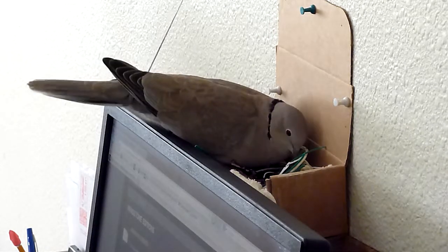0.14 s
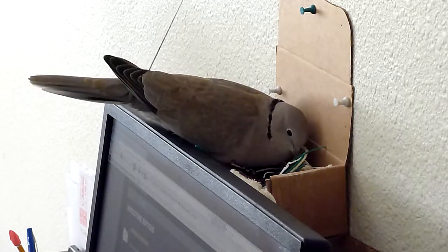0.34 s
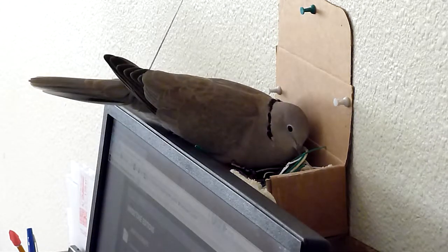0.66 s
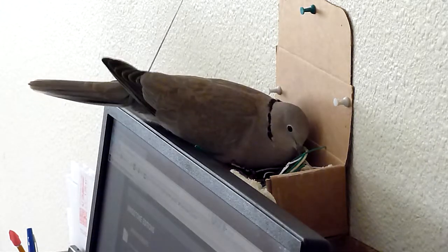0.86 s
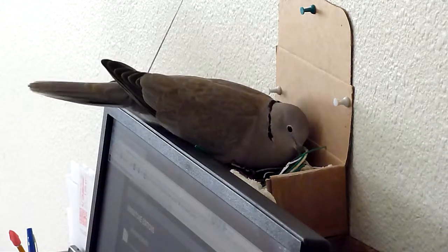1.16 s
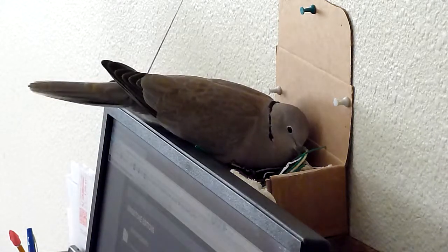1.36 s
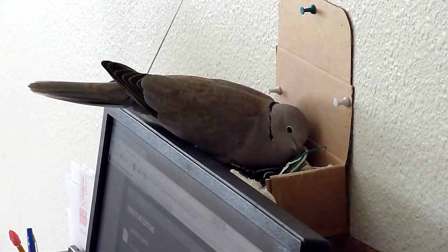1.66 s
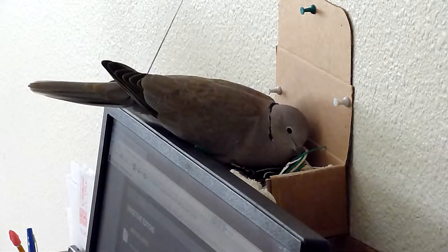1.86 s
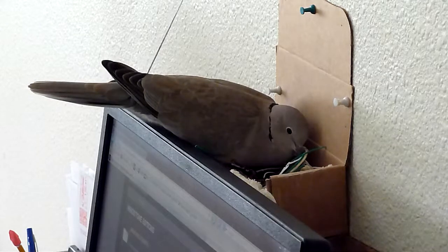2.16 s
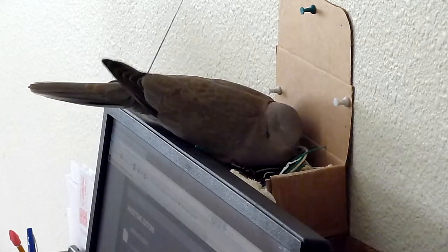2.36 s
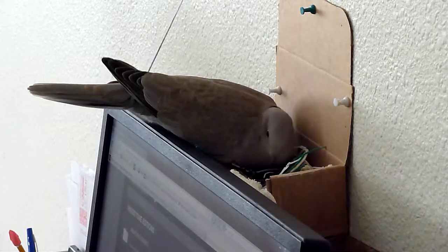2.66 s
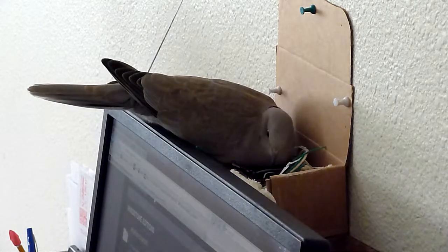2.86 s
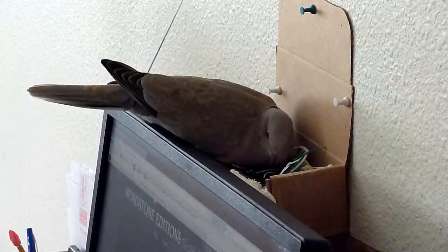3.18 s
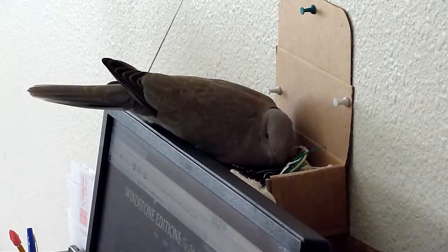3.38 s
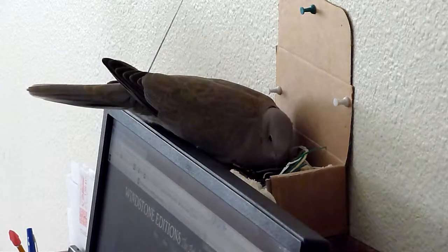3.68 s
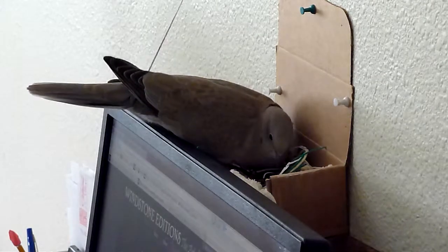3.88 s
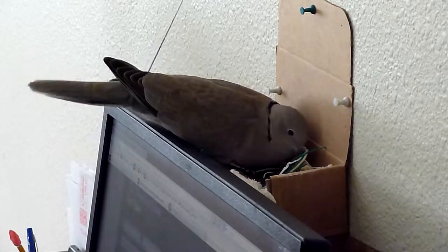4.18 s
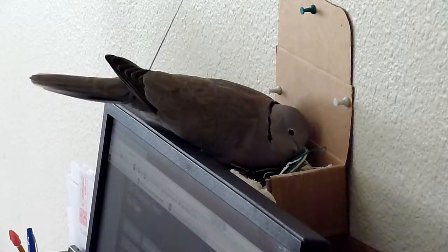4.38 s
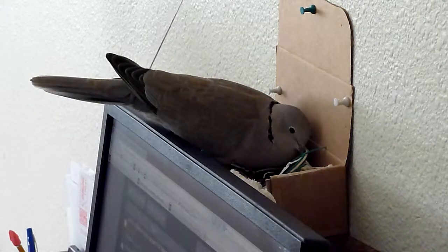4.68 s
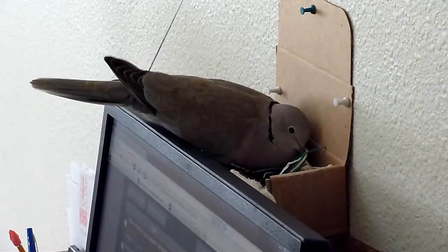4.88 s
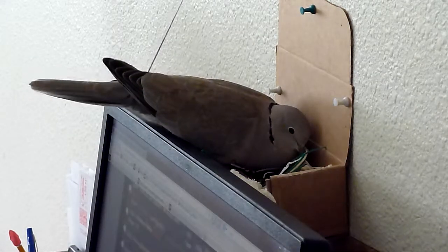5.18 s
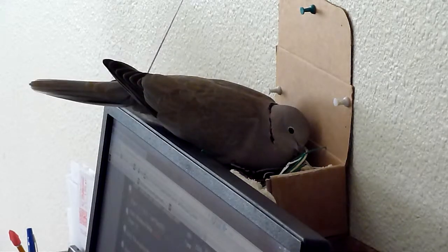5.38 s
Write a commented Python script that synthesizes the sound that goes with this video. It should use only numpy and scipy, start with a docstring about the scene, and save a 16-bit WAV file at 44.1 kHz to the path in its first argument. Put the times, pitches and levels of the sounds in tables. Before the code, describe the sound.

In a small room with a steady soft hiss and a very faint low hum, a dove close by and slightly left is already cooing. The tail of a short note ends at 0.1 s, a long hollow note runs from about 0.16 to 0.73 s, and a short one follows near 1.0 s. The tone is mid-low, smooth and nearly pure, fluttering in level, scooping up at its start and dropping at its end, with a little airy rasp and boxy room ringing. Quiet mouse clicks to the right come in pairs around 0.5-0.65 s, under the long note, and 1.45-1.6 s. Thin, bright switch ticks sound around 2.7 and 2.78 s. A soft, dull double knock on the desk comes at 3.45 s. The dove then repeats its phrase: short at 4.0 s, long from 4.2 to 4.75 s, short at 5.0 s, leaving only hiss until about 5.5 s.

```python
"""A dove's coo, already under way, is heard first over a soft hiss and low hum; six notes come in two groups.
Each note is a gliding near-pure tone with faint partials and airy rasp, coloured by a small room's low modes.
To the right, a mouse button clicks in pairs (ringing modes) and a thin switch ticks (short noise bursts).
A soft double knock, low noise plus ringing desk modes, comes shortly before the second group of notes.
Two microphone ports hear it all: the dove, nearer the left one, reaches that port louder and earlier."""
import sys
import numpy as np
from scipy import signal
from scipy.fft import rfft, irfft
from scipy.io import wavfile
from scipy.ndimage import uniform_filter1d

SR = 44100
rng = np.random.default_rng(int(sys.argv[2]) if len(sys.argv) > 2 else 0)


def log_audio(samples):
    """Write samples as a 16-bit WAV file to the path given in sys.argv[1]."""
    # one column per channel
    frames = np.atleast_2d(samples).T
    # limit to full scale, then quantise
    limited = np.clip(frames, -1, 1)
    pcm = np.round(limited * 32767).astype(np.int16)
    wavfile.write(sys.argv[1], SR, pcm)


N = 244314  # length in samples

# All levels in the tables are relative: later gains still act on them.
# Coos: start_s, end_s, base_pitch_hz, final_drop_share_of_pitch, drop_time_s, second_partial_db,
# half_pitch_partials_db, rasp_db, fourth_partial_db, sixth_partial_db
NOTES = [(-0.058, 0.099, 540.5, 0.047, 0.0075, -56, -40, -39.5, -67, -81),
         (0.16, 0.728, 544.3, .27, .04, -58.5, -75.5, -40.5, -72, -73.5),
         (0.965, 1.094, 554.5, 0.197, 0.014, -58, -74, -40.5, -71, -70),
         (3.98, 4.13, 546, 0.1, 0.0079, -53, -43.5, -41, -67, -74),
         (4.2, 4.765, 539.9, .28, .04, -57.5, -73, -40, -67, -77),
         (5.012, 5.126, 556, 0.18, .022, -56, -86, -42.5, -66.5, -80.5)]
# Swells and dips of the main tone, one curve a note: time_s, level_db
TONE_CURVES = [
    [(0.0, -11.5), (0.027, -21.5), (0.052, -27.5), (0.07, -16.5), (0.093, -16.5), (0.105, -22.5)],
    [(0.16, -37.5), (0.199, -21), (0.219, -15), (0.245, -35), (0.262, -29), (0.29, -18), (0.315, -28),
     (0.35, -18.5), (0.42, -26.5), (0.488, -19), (0.55, -30), (0.612, -12), (0.638, -26), (0.66, -19),
     (0.683, -15), (0.692, -19.5), (0.703, -32), (0.728, -25)],
    [(0.965, -32), (0.983, -28.5), (1.012, -14.5), (1.026, -32.5), (1.042, -21), (1.058, -16),
     (1.078, -21.5), (1.096, -21)],
    [(3.979, -26), (4.007, -42), (4.025, -23), (4.037, -25.5), (4.05, -14.5), (4.065, -32.5),
     (4.095, -26.5), (4.11, -16), (4.133, -16)],
    [(4.2, -38.5), (4.24, -22.5), (4.266, -16), (4.297, -23.5), (4.34, -14), (4.41, -24), (4.44, -19),
     (4.47, -27.5), (4.5, -18), (4.55, -19), (4.6, -14.5), (4.635, -13.5), (4.665, -25), (4.69, -17.5),
     (4.714, -15.5), (4.761, -34)],
    [(5.009, -31), (5.028, -32.5), (5.04, -20), (5.048, -18.5), (5.062, -14.5), (5.085, -16),
     (5.108, -16.5), (5.126, -21.5)],
]
# Upper partials: multiple_of_pitch, level_db over the second-partial setting
OVERTONES = [(2, -2.5), (3, -20.5)]
# Partials heard when every second throat pulse is weaker: multiple_of_pitch, level_db
HALF_PITCH_PARTIALS = [(.5, -7.5), (1.5, 1.5), (2.5, -20.5), (3.5, -25.5)]
# Air noise in the throat: frequency_hz, density_db (per Hz)
RASP_COLOUR = [(200, -38.5), (330, -25), (450, -2.5), (560, 9), (680, 3), (780, -15.5), (1000, -23.5),
               (2000, -44.5), (4000, -64)]
# Low modes of the room: frequency_hz, level_db, t60_s (time to fall 60 dB), sign (between bird and ports)
ROOM_MODES = [(352, 11.5, 0.19, 1), (330, 0, 1, -1), (378.9, 12, 0.4, 1), (394, 9.5, 0.44, 1),
              (397, -2, 0.66, 1), (413, -11, 0.43, -1), (437.4, 6, 0.37, 1), (453, -4, 0.78, -1),
              (490, -5, 0.31, 1), (512, -4.5, 0.39, -1), (475.5, -9.5, 0.43, -1), (523.2, -8.5, 0.64, -1),
              (538.2, -0.5, 0.42, 1), (541.27, 5.5, 0.19, -1), (616.4, -12, 0.46, -1), (590, -1, 0.23, 1),
              (640, 2, 0.43, -1), (622, -6, 0.76, 1), (692, -8.5, 0.76, -1), (705, -7.5, 0.18, 1),
              (670, -6, 0.79, -1), (750, -10.5, 0.23, 1)]
# How long the dense reflections last: frequency_hz, t60_s
ROOM_TAIL = [(200, 0.18), (700, .38), (1500, 0.34), (4000, 0.52), (6000, 0.26), (9000, 0.25),
             (15000, 0.073)]
# Room air and microphone hiss, sum of the ports: frequency_hz, density_db (per Hz)
HISS_MID = [(12, -51), (20, -12), (172, -5), (204, -0.5), (228, -3.5), (377, -3.5), (433, -6), (471, -6),
            (1030, -10.5), (1180, -12), (2130, -15), (11100, -22.5), (16000, -32.5)]
# The same hiss, difference of the ports: frequency_hz, density_db (per Hz)
HISS_SIDE = [(12, -56.5), (20, -31), (60, -10.5), (150, -4.5), (356, -0.5), (471, -2.5), (542, -1),
             (737, -2), (1120, -2.5), (3940, -10), (16000, -24)]
# Slow swells of the hiss: time_s, level_db
HISS_SWELL = [(0, -2), (2.4, -3), (3.2, -1), (3.8, -2), (5.54, -2.5)]
# A narrow wavering hum: frequency_hz, density_db (per Hz)
HUM_COLOUR = [(150, -37), (185, -9.5), (203, 4.5), (222, 1), (270, -50)]
# Mouse button: time_s, level_db, released (0 pressed, 1 released)
MOUSE_CLICKS = [(0.528, -38, 0), (0.656, -33.5, 1), (1.463, -39, 0), (1.606, -33, 1)]
# Contact chatter within each click: delay_s, level_db
BOUNCES = [(0, -6), (.002, 6.5), (.0045, 3), (.008, -11)]
# Modes of the mouse shell: frequency_hz, pressed_db, released_db, t60_s
SHELL_MODES = [(690, -2.5, -5.5, 0.012), (1190, -8.5, -10.5, 0.0069), (1660, -19.5, -14.5, 0.014),
               (2725, -8, -14.5, 0.0061), (3500, -11.5, -15.5, 0.0044), (5330, -1.5, -5, 0.0045),
               (5830, 1.5, -3, 0.0041), (7580, 1, -12, 0.012), (9000, 3, -2, 0.0014), (11640, 0, 3, 0.0017),
               (13900, -7.5, -5.5, 0.008), (15400, -2, -5.5, .004)]
# Thin switch: time_s, level_db, bass_cut_hz
SWITCH_TICKS = [(2.688, -35, 6000), (2.6923, -29, 5500), (2.7748, -30, 3500), (2.779, -27, 3000),
                (2.783, -33, 3500)]
# Tick noise: frequency_hz, density_db (per Hz)
TICK_COLOUR = [(1470, -46), (2500, -22), (3540, -7), (5320, -17), (5930, 1), (6460, -12), (7140, 1.5),
               (12300, -4.5), (15800, -9)]
# Soft blows on the desk: time_s, level_db
KNOCKS = [(3.451, -42), (3.474, -42.5)]
# Knock noise: frequency_hz, density_db (per Hz)
KNOCK_COLOUR = [(60, -40), (110, -17), (230, -6), (350, -8.5), (600, -10), (1400, -17), (3000, -25.5),
                (5000, -33), (8000, -70)]
# Modes of the desk top: frequency_hz, level_db, t60_s
DESK_MODES = [(241, -6, .22), (335, -7.5, 0.15), (595, -11.5, 0.11)]

# Each note scoops up from below, arches a little and drops at the end (SCOOP and ARCH: share of pitch)
SCOOP, SCOOP_S, SCOOP_SHAPE, ARCH, DROP_SHAPE = 0.26, 0.024, 1.074, 0.0088, 0.8
# Level change per share of pitch that the voice lies below its base pitch
SECOND_SLACK_DB, RASP_SLACK_DB, FOURTH_SLACK_DB, SIXTH_SLACK_DB = 27, 29, -89.5, -140
# The half-pitch partials are strongest at this time after the start and fade on both sides
HALVES_AFTER_S, HALVES_SPAN_S, HALVES_FADE_DB = 0.115, 0.036, -11.5
# Random unsteadiness: share of pitch, time scale, level of the upper partials
WAVER, WAVER_S, FLICKER_DB = 0.0015, 0.018, 3.5
# The rasp builds up after the start and grows to the end
RASP_CLIMB_DB, RASP_CLIMB_S, RASP_END_DB = 10.5, 0.094, 6.5
HISS_MID_DB, HISS_SIDE_DB, HUM_DB = -53.5, -51, -71.0  # rms before the swell and port gains
EDGE_HZ = 16000  # upper band limit


def gain_of(db):
    """Turn decibels into a plain multiplier."""
    return 10 ** (np.asarray(db) / 20)


def read(points, hz):
    """Read a curve between its points on a logarithmic pitch scale."""
    f, value = np.transpose(points)
    return np.interp(np.log(hz + 1), np.log(f + 1), value)


def add(mix, start_s, sound):
    """Lay a sound into the mix at its start time."""
    part = mix[round(start_s * SR):][:len(sound)]
    part += sound[:len(part)]


def coloured(points, size):
    """Noise of rms 1 with the given spectrum."""
    spectrum = rfft(rng.standard_normal(size))
    x = irfft(spectrum * gain_of(read(points, np.fft.rfftfreq(size, 1 / SR))), size)
    return x / np.std(x)


def ring(hz, db, t60, t):
    """One mode: a sine that dies away by 60 dB in t60 seconds."""
    return gain_of(db - 60 * t / t60) * np.sin(2 * np.pi * hz * t)


def without_bass(x, hz):
    """Small bodies radiate little bass, so cut it below hz."""
    return signal.sosfilt(signal.butter(N=2, Wn=hz, btype="high", fs=SR, output="sos"), x)


def from_left(x, count=5):
    """The left port hears it louder and some samples sooner."""
    later = np.r_[np.zeros(count), x[:-count]]
    return np.array([x * gain_of(4.0), later * gain_of(3.0)])


def room_modes(x):
    """At low pitches the small room answers with separate ringing modes."""
    t = np.arange(SR // 2) / SR
    answer = sum(np.sign(sign) * ring(hz, db, t60, t) for hz, db, t60, sign in ROOM_MODES)
    return signal.fftconvolve(x, answer / 1500)[:N]


def room_tail(x, gap_s):
    """Dense reflections: sparse random-sign taps, different at each port, each band dying at its own speed."""
    taps = np.zeros((2, SR // 2))
    at = np.arange(round(gap_s * SR), SR // 2 - 20, 20)
    at = at + rng.integers(0, 20, (2, SR // 40))[:, :len(at)]
    signs = rng.choice([-1., 1.], (2, SR // 40))[:, :at.shape[1]]
    np.put_along_axis(taps, at, signs, 1)
    hz, t, bands = signal.stft(taps, SR, nperseg=256)
    fade = gain_of(-60 * t / read(ROOM_TAIL, hz)[:, None])
    decay = signal.istft(bands * fade, SR, nperseg=256)[1]
    return signal.fftconvolve(x[None], decay / np.linalg.norm(decay[0]), axes=1)[:, :N]


def coo_note(row, tone_curve):
    """The syrinx (voice organ) tone, faint partials and air rasp; a slack, low voice is breathier."""
    (start, end, base_hz, drop, drop_s, second_db, half_db, rasp_db,
     fourth_db, sixth_db) = row
    t = np.arange(max(start, 0), end, 1 / SR)
    share = (t - start) / (end - start)

    # slack: how far the pitch lies below its base, as a share
    scoop = SCOOP * np.exp(-((t - start) / SCOOP_S) ** SCOOP_SHAPE)
    final_drop = drop * np.exp(-((end - t) / drop_s) ** DROP_SHAPE)
    slack = scoop + final_drop
    slow = [(1, 0), (1 / WAVER_S, 0), (2 / WAVER_S, -40), (SR, -200)]  # frequency_hz, density_db
    waver = coloured(slow, len(t))
    flicker = gain_of(FLICKER_DB * coloured(slow, len(t)))
    hz = base_hz * (1 - slack + ARCH * np.sin(np.pi * share) + WAVER * waver)
    angle = 2 * np.pi * np.cumsum(hz) / SR

    # smooth the corners of the level curve
    tone_db = uniform_filter1d(np.interp(t, *np.transpose(tone_curve)), size=250)
    main = gain_of(tone_db) * np.sin(angle)
    upper = sum(gain_of(db) * np.sin(k * angle) for k, db in OVERTONES)
    upper *= flicker * gain_of(second_db + SECOND_SLACK_DB * slack)
    distance = ((t - start - HALVES_AFTER_S) / HALVES_SPAN_S) ** 2
    halves = sum(gain_of(db) * np.sin(k * angle) for k, db in HALF_PITCH_PARTIALS)
    halves *= gain_of(half_db + HALVES_FADE_DB * distance)
    tones = np.sqrt(2) * (main + upper + halves)

    top = gain_of(fourth_db + FOURTH_SLACK_DB * slack) * np.sin(4 * angle)
    top += gain_of(sixth_db + SIXTH_SLACK_DB * slack) * np.sin(6 * angle)

    climb_db = RASP_END_DB * share ** 2 - RASP_CLIMB_DB * np.exp((start - t) / RASP_CLIMB_S)
    rasp = gain_of(rasp_db + climb_db + RASP_SLACK_DB * slack) * coloured(RASP_COLOUR, len(t))

    # 6 ms smooth fade at both ends
    edge = np.sin(np.pi / 2 * np.clip(np.minimum(t - t[0], end - t) / 0.006, 0, 1)) ** 2
    return t[0], (tones + rasp) * edge, np.sqrt(2) * flicker * top * edge


def dove():
    """Direct voice and room modes; the dense reflections carry mostly the second and third partials."""
    voice, top = np.zeros((2, N))
    for row, tone_curve in zip(NOTES, TONE_CURVES):
        start_s, low_part, top_part = coo_note(row, tone_curve)
        add(voice, start_s, low_part)
        add(top, start_s, top_part)
    voice = without_bass(voice, 230)
    above_tone = signal.butter(N=10, Wn=740, btype="high", fs=SR, output="sos")
    upper = signal.sosfilt(above_tone, voice)
    wet = room_tail(upper + gain_of(-9.5) * top, 0.004)
    body = voice + room_modes(voice) + gain_of(-4.0) * wet[0]
    near = from_left(body, count=7) + from_left(top, count=2)
    return near + gain_of(-5) * wet


def hiss():
    """Swelling noise floor, part alike and part opposite at the ports, with a low hum made of narrow noise."""
    mid = gain_of(HISS_MID_DB) * coloured(HISS_MID, N)
    side = gain_of(HISS_SIDE_DB) * coloured(HISS_SIDE, N)
    swell = gain_of(np.interp(np.arange(N) / SR, *np.transpose(HISS_SWELL)))
    floor = swell * np.array([mid + side, mid - side]) * gain_of([[.3], [-.3]])
    hum = gain_of(HUM_DB) * coloured(HUM_COLOUR, N)
    return floor + from_left(hum)


def mouse_clicks():
    """Snap blows with contact chatter make the modes of the mouse shell ring."""
    out, t = np.zeros(N), np.arange(1500) / SR
    for start_s, level_db, released in MOUSE_CLICKS:
        for delay_s, bounce_db in BOUNCES:
            # each bounce lands a little differently: mode pitches shift, and start up or down
            spread = rng.uniform(0.94, 1.012, len(SHELL_MODES))
            shell = np.zeros(len(t))
            for k, (hz, pressed_db, released_db, t60) in zip(spread, SHELL_MODES):
                mode_db = released_db if round(released) else pressed_db
                shell += np.sign(k - 1) * ring(hz * k, mode_db, t60, t)
            attack = np.minimum(t / 0.00026, 1)
            add(out, start_s + delay_s, gain_of(level_db + bounce_db - 1.0) * shell * attack)
    return out


def switch_ticks():
    """The thin switch gives bare ticks: noise bursts that fall 60 dB in 18 ms."""
    out, t = np.zeros(N), np.arange(1500) / SR
    for start_s, level_db, bass_cut_hz in SWITCH_TICKS:
        burst = without_bass(coloured(TICK_COLOUR, len(t)), bass_cut_hz)
        add(out, start_s, gain_of(level_db - 7.5 - 60 * t / 0.018) * burst)
    return out


def clicks():
    """Mouse and switch lie to the right: the right port hears them louder, direct and reflected."""
    out = without_bass(mouse_clicks() + switch_ticks(), 300)
    return out * gain_of([[-5], [0]]) + gain_of([[-1], [2]]) * room_tail(out, 0.0029)


def knocks():
    """Dull blows on the desk: puffs of low noise and the ringing top, direct and through the room."""
    out, t = np.zeros(N), np.arange(6000) / SR
    for start_s, level_db in KNOCKS:
        fade = gain_of(level_db - 60 * t / 0.085) * np.minimum(t / 0.00074, 1)
        add(out, start_s, fade * coloured(KNOCK_COLOUR, len(t)))
        desk = sum(ring(*mode, t) for mode in DESK_MODES)
        add(out, start_s, gain_of(level_db) * np.minimum(t / 0.0031, 1) * desk)
    out = without_bass(out, 110)
    near = from_left(gain_of(3.5) * out + room_tail(out, 0.00302)[0])
    return near + gain_of(-2) * room_tail(out, 0.0032)


def scene():
    """All the sounds together at the two ports."""
    return dove() + hiss() + clicks() + knocks()


def record(dry):
    """The band limit of the camera: a low-pass that cuts the highest treble."""
    low_pass = signal.firwin(511, EDGE_HZ, window=("kaiser", 9), fs=SR)
    return signal.oaconvolve(dry, low_pass[None], "same")


dry = scene()
out = record(dry)
log_audio(out)
```